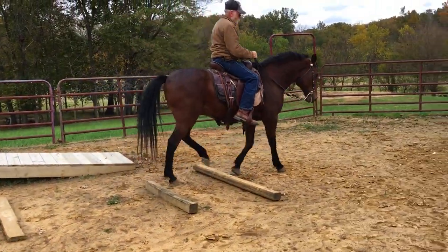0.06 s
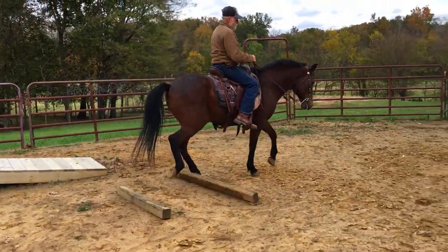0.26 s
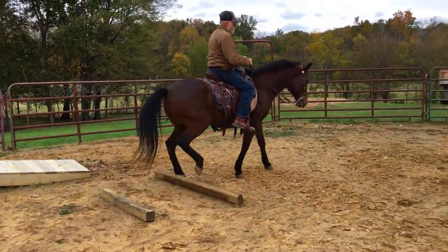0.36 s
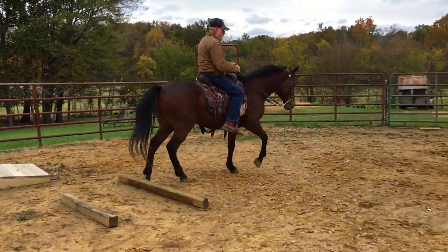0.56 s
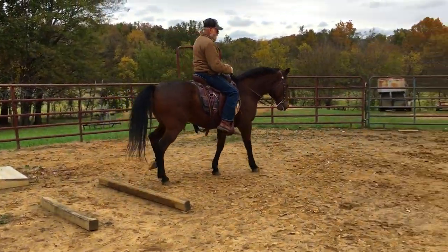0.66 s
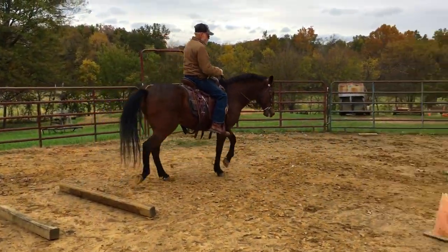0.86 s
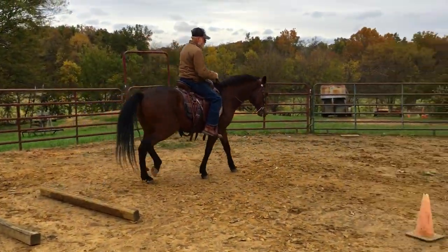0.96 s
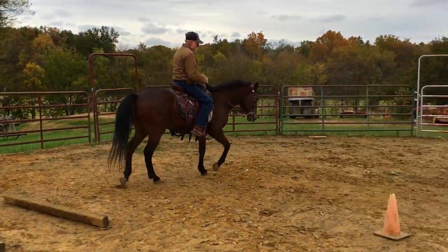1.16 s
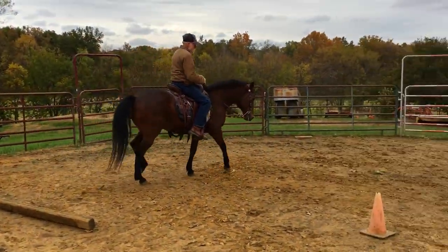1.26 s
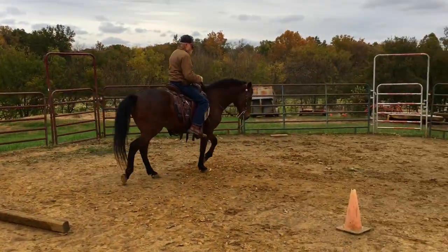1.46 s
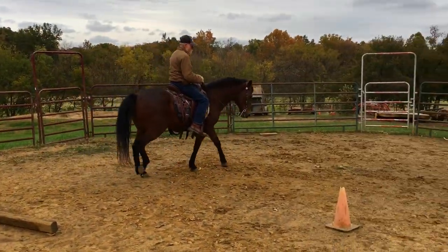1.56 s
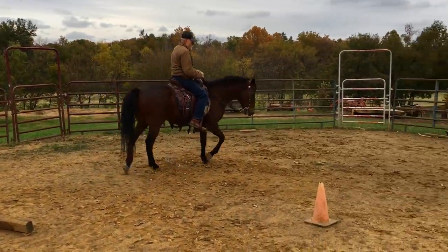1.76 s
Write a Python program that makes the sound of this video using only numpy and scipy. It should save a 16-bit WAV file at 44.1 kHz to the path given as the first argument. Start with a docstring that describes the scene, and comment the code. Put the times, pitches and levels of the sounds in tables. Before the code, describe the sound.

A hollow knock of hoof on wood, followed by a horse walking softly over sand.

```python
"""Two hooves catch a wooden pole lying in a sand arena: a light graze, then a square, hollow knock.
Each blow rings the pole's modes under a crack of hoof wall, and the hoof drags over the sandy wood.
The horse walks on with soft crunches, low thumps, one hard click and small ticks of grit and tack.
Faint echoes return across the open ground. Wind buffets the microphone over a quiet outdoor hiss."""
import sys
import numpy as np
from scipy import signal
from scipy.fft import rfft, irfft
from scipy.io import wavfile
from scipy.ndimage import uniform_filter1d

SR = 44100
rng = np.random.default_rng(int(sys.argv[2]) if len(sys.argv) > 2 else 0)


def unload_audio(sound):
    """Save the sound as a 16-bit wav file, at the path given as the first command line argument."""
    columns = np.transpose(np.atleast_2d(sound))
    # keep every value between -1 and 1, then stretch to whole-number steps
    steps = np.round(np.clip(columns, -1, 1) * 32767)
    wavfile.write(sys.argv[1], SR, steps.astype(np.int16))


N = 79380

# tone of loose sand, in scrapes and steps (frequency [Hz], relative level [dB])
GRIT_SPECTRUM = [(800, -16.5), (2500, -1), (3500, 0.5), (6000, -2), (9000, -6.5), (13000, -8), (16000, -13)]


def pole_knocks():
    """Each blow pushes the pole for a moment and rings its modes; the hard hoof wall cracks on contact."""
    # pole modes (frequency [Hz], relative level [dB], free t60 [s], swing at the struck spot [+1 or -1])
    modes = [(255.3, -2.5, 0.074, -1), (415, -17, 0.061, -1), (610, -9, .026, -1), (713, -4, 0.076, 1),
             (852, -5.5, 0.012, 1), (985, -25.5, 0.087, 1), (1230, -29.5, 0.056, 1),
             (1690, -31.5, 0.038, 1), (2080, -39.5, .036, 1)]
    # hoof blows (time [s], level [dB], contact time [s], crack level [dB])
    blows = [(.2045, -31, 0.0006, -53), (0.2338, -31.5, 0.00024, -63), (.4101, -1, 0.00029, -33),
             (0.414, -34, 0.00045, -44)]
    # tone of the crack (frequency [Hz], relative level [dB])
    crack_spectrum = [(200, -26.5), (900, 4.5), (1600, 2.5), (2300, -5), (2700, -5.5), (3300, -3.5),
                      (5800, -4), (6800, -14.5), (9000, -16), (15000, -25)]
    t = np.arange(N) / SR
    attack_s, choke_s = 0.0013, 0.044
    ring = sum(np.sign(swing) * undb(db) * np.sin(2 * np.pi * hz * t) * burst(0, 0, t60)
               for hz, db, t60, swing in modes)
    ring *= np.minimum(t / attack_s, 1) * np.exp(-(t / choke_s) ** 4)  # hoof and sand choke the ring
    ring = pass_filter(ring, "high", hz=281, order=4)  # the thin pole radiates no deep bass
    force, crack_envelope = np.zeros(N), np.zeros(N)
    for start, db, contact, crack_db in blows:
        push = np.exp(-np.pi * (2 * (t - start - contact) / contact) ** 2)
        force += undb(db) * push / push.sum()
        crack_envelope += undb(crack_db) * burst(start + contact, rise=0.00033, t60=0.018)
    crack = steady(colour(sand_grains(), crack_spectrum), seconds=0.012)
    return signal.fftconvolve(force, ring)[:N] + crack_envelope * crack


def pole_scrapes():
    """The hoof drags over the pole: a woody rub with sand hissing in it."""
    # hoof drags (time [s], rise [s], t60 [s], rub level [dB], grit level [dB])
    drags = [(0.2022, .003, 0.065, -25.5, -50.5), (0.2252, .002, 0.015, -44, -56.5),
             (0.2315, .002, .13, -40, -73), (.273, .014, .04, -52, -59), (0.318, .015, .12, -56.5, -64.5)]
    # tone of hoof rubbing wood (frequency [Hz], relative level [dB])
    rub_spectrum = [(120, -21.5), (260, -10.5), (370, 2.5), (480, 3), (700, -6), (900, -7.5), (1100, -15.5),
                    (1350, -13.5), (1850, -19), (2600, -36.5), (6000, -61.5)]
    rub = steady(colour(sand_grains(), rub_spectrum), seconds=0.0028)
    grit = colour(sand_grains(), GRIT_SPECTRUM)
    return sum(burst(start, rise, t60) * (undb(rub_db) * rub + undb(grit_db) * grit)
               for start, rise, t60, rub_db, grit_db in drags)


def sand_steps():
    """Sand packs under a hoof with a short dull crunch and a spray of grit."""
    # hoof falls (time [s], rise [s], t60 [s], crunch centre [Hz], crunch level [dB], grit level [dB])
    hoof_falls = [(0.46, 0.0041, 0.044, 920, -46.5, -69), (0.537, 0.023, 0.063, 1550, -57.5, -80),
                  (.631, 0.0022, 0.051, 410, -37.5, -76), (.907, 0.0016, 0.036, 1330, -49, -58),
                  (0.908, 0.0041, 0.031, 500, -42, -76), (0.995, 0.0046, 0.053, 286, -37.5, -82),
                  (1.507, .005, 0.016, 1160, -44, -60.5), (1.513, 0.0039, 0.013, 564, -45, -70),
                  (1.661, 0.0024, 0.076, 1420, -52.5, -67)]
    out, grit = np.zeros(N), colour(sand_grains(), GRIT_SPECTRUM)
    for start, rise, t60, hz, crunch_db, grit_db in hoof_falls:
        crunch = steady(band(sand_grains(), hz, width=0.65 * hz), seconds=0.011)
        out += burst(start, rise, t60) * (undb(crunch_db) * crunch + undb(grit_db) * grit)
    return out


def ground_thumps():
    """The horse's weight lands and a few low cycles die away in the ground."""
    # thumps (time [s], pitch [Hz], level [dB], t60 [s])
    thumps = [(.219, 72.8, -24, 0.22), (.838, 92, -21.5, 0.031), (1.153, 62.6, -16, .1),
              (1.151, 164, -35, 0.063), (1.461, 184, -37.5, 0.033), (1.627, 151.4, -41, 0.017)]
    t = np.arange(N) / SR
    return sum(-undb(db) * np.sin(2 * np.pi * hz * (t - start)) * burst(start, rise=0.0066, t60=t60)
               for start, hz, db, t60 in thumps)


def hoof_click():
    """A hoof clips something hard in the sand, perhaps a pebble: a brief bright ring."""
    # modes of the click (frequency [Hz], relative level [dB], t60 [s])
    modes = [(1075, -6, 0.017), (1420, -1.5, 0.017), (1553, -3.5, 0.026), (1627, -13.5, 0.12),
             (2390, -9, 0.025)]
    start_s, gain_db = 1.2102, -35.5
    t = np.arange(N) / SR - start_s
    return sum(undb(gain_db + db) * np.sin(2 * np.pi * hz * t) * burst(start_s, rise=0.00095, t60=t60)
               for hz, db, t60 in modes)


def grit_and_tack():
    """Small hard contacts tick, each with its own brightness."""
    # ticks (time [s], centre [Hz], bandwidth [Hz], level [dB], t60 [s])
    ticks = [(.1405, 12000, 7200, -61, 0.0072), (0.2269, 5670, 1314, -48, 0.015),
             (0.6755, 3400, 2500, -50.5, 0.024), (0.6755, 9500, 8900, -49.5, 0.0035),
             (0.918, 10000, 10000, -61, 0.0094), (1.2097, 3930, 8850, -52, 0.0047),
             (1.558, 5500, 7900, -57, .008), (1.662, 2600, 2920, -56, 0.019)]
    out = np.zeros(N)
    for start, hz, width, db, t60 in ticks:
        noise = steady(band(rng.standard_normal(N), hz, width), seconds=0.0054)
        out += undb(db) * burst(start, rise=0.0018, t60=t60) * noise
    return out


def arena(x):
    """Open ground adds a very faint tail, a smeared return from the trees and two thin near echoes."""
    # echoes off the arena's edge (delay [s], level [dB], low cut [Hz])
    echoes = [(.0452, -18.5, 1204), (.0514, -16, 1250)]
    t = np.arange(N) / SR
    tail = burst(0, rise=0.03, t60=0.56)
    trees_delay_s, trees_spread_s = 0.16, 0.014
    trees = np.exp(-((t - trees_delay_s) / trees_spread_s) ** 2 / 2)
    out = x.copy()
    for envelope, db, hz in [(tail, -27.5, 1700), (trees, -28, 1100)]:
        response = envelope * band(rng.standard_normal(N), hz, width=1400)
        response /= np.abs(rfft(response)).max()
        out += undb(db) * signal.fftconvolve(x, response)[:N]
    dull = pass_filter(x, "low", hz=1480, order=3)
    for delay, db, low_cut in echoes:
        thin = pass_filter(dull, "high", low_cut, order=2)
        out += undb(db) * np.interp(t - delay, t, thin, left=0)
    return out


def wind_buffets():
    """Eddies at the microphone: a gusting rumble with a higher flutter above it."""
    # gust contour in two consecutive runs (time [s], rumble level [dB], flutter level [dB])
    gusts = [
        [(0.0, -18.5, -25.5), (0.014, -38.5, -35), (0.054, -49, -54.5), (0.088, -47, -57), (0.108, -37.5, -48),
         (0.174, -43, -50.5), (0.206, -35, -33), (0.236, -26.5, -36.5), (0.26, -41.5, -40), (0.32, -42.5, -57),
         (0.346, -42, -44.5), (0.37, -26.5, -45), (0.388, -30.5, -41), (0.395, -34, -37)],
        [(0.465, -39, -43.5), (0.491, -31, -41), (0.517, -35, -47.5), (0.631, -31.5, -34.5), (0.731, -57, -62),
         (0.777, -34.5, -40), (0.873, -32.5, -39.5), (1.033, -31, -33), (1.055, -23, -39.5),
         (1.121, -44.5, -66), (1.155, -32, -47), (1.223, -37.5, -49), (1.263, -35.5, -40.5), (1.315, -30, -49),
         (1.355, -43, -42), (1.427, -30, -47.5), (1.519, -37.5, -46), (1.557, -36, -68), (1.645, -35.5, -38),
         (1.701, -63, -96), (1.723, -41.5, -85), (1.8, -62, -67)],
    ]
    # tone of each wind layer (frequency [Hz], relative level [dB])
    rumble_spectrum = [(10, -51), (22, -26.5), (32, -12.5), (48, -1), (62, 7.5), (85, 1.5), (120, -11),
                       (170, -27), (300, -59), (3000, -110)]
    flutter_spectrum = [(30, -35), (70, -13), (130, 3.5), (190, -3), (260, -7.5), (380, -19.5), (600, -29),
                        (1000, -47), (2000, -64), (12000, -100)]
    rumble_trim_db, flutter_trim_db, fade_in_s = -0.5, 0.5, 0.004
    t = np.arange(N) / SR
    times, rumble_db, flutter_db = np.vstack(gusts).T
    rumble = steady(colour(rng.standard_normal(N), rumble_spectrum), seconds=0.02)
    rumble *= undb(np.interp(t, times, rumble_db) + rumble_trim_db)
    flutter = steady(colour(rng.standard_normal(N), flutter_spectrum), seconds=0.082)
    flutter *= undb(np.interp(t, times, flutter_db) + flutter_trim_db)
    return (rumble + flutter) * np.minimum(t / fade_in_s, 1)


def distant_trees():
    """A smooth bed of hiss from distant trees, slowly rising."""
    # tone of the hiss (frequency [Hz], relative level [dB])
    hiss_spectrum = [(100, 8), (400, 4), (800, 4.5), (1500, 4.5), (2000, 2.5), (2700, -4), (3600, -0.5),
                     (5000, -7), (6500, -7.5), (9000, -13.5), (12000, -19), (16000, -25)]
    start_db, rise_db_per_s = -62.5, 1
    t = np.arange(N) / SR
    return colour(rng.standard_normal(N), hiss_spectrum) * undb(start_db + rise_db_per_s * t)


def sand_grains(per_second=9800, size_spread=0.65):
    """Dense clicks of sand grains of uneven size."""
    hits = rng.random(N) < per_second / SR
    return hits * rng.choice([-1, 1], N) * np.exp(size_spread * rng.standard_normal(N))


def undb(db):
    """Decibels to gain."""
    return 10 ** (np.asarray(db) / 20)


def colour(x, points):
    """EQ a steady sound along (frequency [Hz], level [dB]) points, then scale it to rms 1."""
    hz, db = np.array(points, float).T
    bins_hz = np.maximum(np.fft.rfftfreq(N, 1 / SR), 1)
    gain = undb(np.interp(np.log(bins_hz), np.log(hz), db))
    shaped = irfft(rfft(x) * gain, N)
    return shaped / np.sqrt(np.mean(shaped ** 2) + 1e-20)


def pass_filter(x, kind, hz, order):
    """Causal low-, high- or band-pass with a flat passband."""
    return signal.sosfilt(signal.butter(order, hz, kind, fs=SR, output="sos"), x)


def band(x, hz, width):
    """Band-pass around a geometric centre; centre and width in Hz."""
    low = np.hypot(hz, width / 2) - width / 2
    return pass_filter(x, "band", [low, min(low + width, 0.47 * SR)], order=2)


def steady(x, seconds):
    """Hold a noise near rms 1 over a sliding window."""
    power = np.abs(uniform_filter1d(x ** 2, max(int(seconds * SR), 2)))
    return x / np.sqrt(power + 1e-12)


def burst(start, rise, t60):
    """Envelope: a linear attack, then exponential decay; times in seconds."""
    t = np.arange(N) / SR - start
    attack = np.clip(t / max(rise, 1e-5), 0, 1)
    return attack * np.exp(-np.log(1000) * np.maximum(t - rise, 0) / t60)


def scene():
    """Mono mix: the horse in the arena, with dry thumps, wind and hiss."""
    horse = pole_knocks() + pole_scrapes() + sand_steps() + hoof_click() + grit_and_tack()
    return (arena(horse) + ground_thumps() + wind_buffets() + distant_trees())[None]


def record(dry):
    """A steep high cut takes off the very top."""
    top_hz = 15800
    return signal.sosfilt(signal.ellip(10, 0.2, 80, top_hz, fs=SR, output="sos"), dry)


dry = scene()
out = record(dry)
unload_audio(out)
```